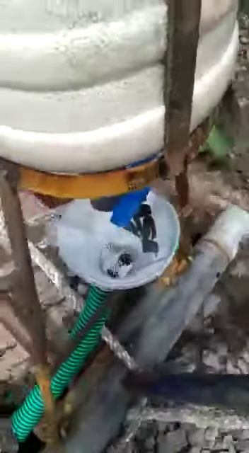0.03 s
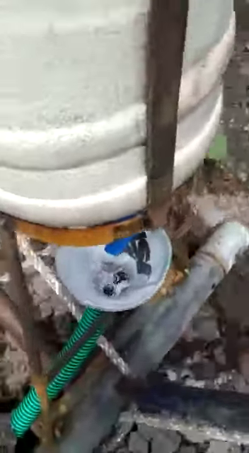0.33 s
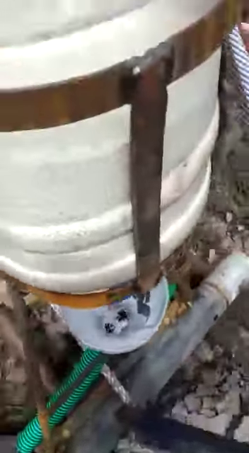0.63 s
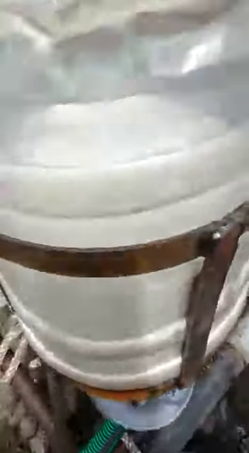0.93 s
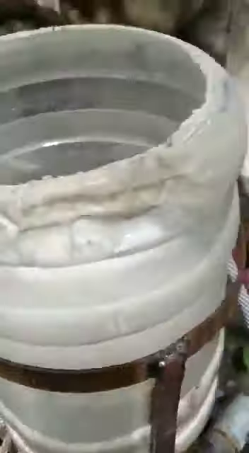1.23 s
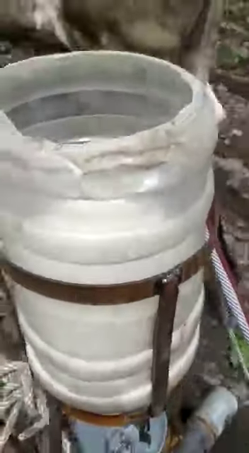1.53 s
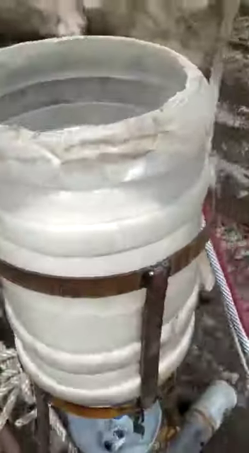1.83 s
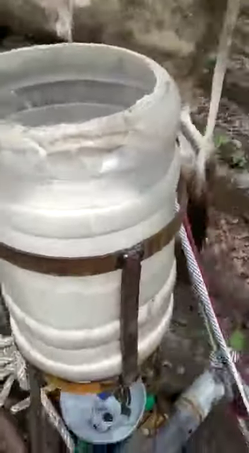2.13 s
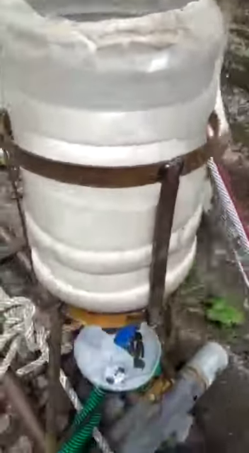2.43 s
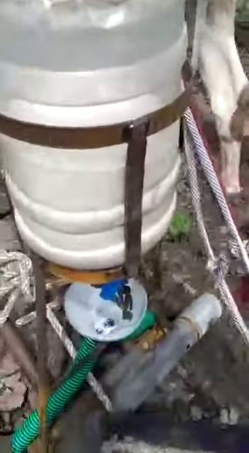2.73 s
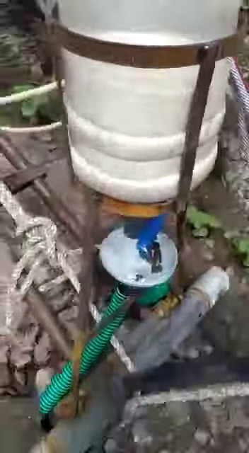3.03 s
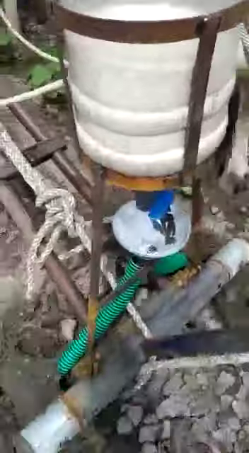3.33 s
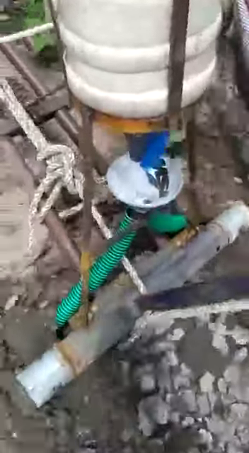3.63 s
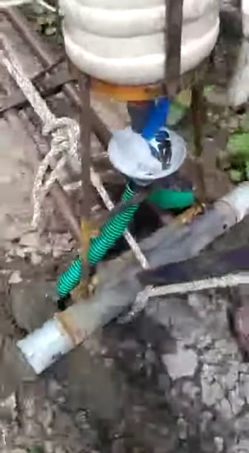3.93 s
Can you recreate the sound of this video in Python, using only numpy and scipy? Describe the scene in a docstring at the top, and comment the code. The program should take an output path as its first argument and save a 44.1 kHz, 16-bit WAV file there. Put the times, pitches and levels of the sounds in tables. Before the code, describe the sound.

Uneven hiss of water drawn down a funnel into a hose, under gusty wind rumble.

```python
"""Outdoors, water and air are drawn down a small funnel into a hose: an uneven, spitting hiss, coloured
by the hose's narrow resonances, over light wind and faint distant air. Soft slurps and airy whistles
come and go. From half a second in, gusts buffet the two ports of a hand-held microphone, with hollow
knocks at the sharpest hits. A lull follows, with one thump of air on the left. Near two seconds the
gusts return and stay to the end, rasping and knocking when they hit hard."""
import sys
import numpy as np
from scipy import signal
from scipy.fft import rfft, irfft
from scipy.io import wavfile
from scipy.ndimage import map_coordinates

SR = 44100
rng = np.random.default_rng(int(sys.argv[2]) if len(sys.argv) > 2 else 0)


def wav_record(signal):
    """Record a signal, one row per channel, as 16-bit PCM in the file named by sys.argv[1]."""
    frames = np.transpose(np.atleast_2d(signal))
    bounded = np.clip(frames, -1, 1)
    # unit amplitude maps onto the largest positive 16-bit level
    quanta = np.round(bounded * 32767).astype(np.int16)
    wavfile.write(sys.argv[1], SR, quanta)


N = 176400
TIME = np.arange(N) / SR


def from_db(db):
    """Decibels to gain."""
    return 10 ** (np.asarray(db) / 20)


def unit_rms(x):
    """Scale to an rms of 1."""
    return x / np.sqrt(np.mean(x ** 2) + 1e-20)


def automation(rows):
    """Join breakpoints (seconds, values..) with straight lines: one curve per value column."""
    times, *columns = np.transpose(rows)
    return np.array([np.interp(TIME, times, column) for column in columns])


def bell(offset, width):
    """A bell of height 1, half as high at the ends of its width."""
    return .5 ** ((2 * offset / width) ** 2)


def swell(centre_s, length_s):
    """A bell-shaped fade in and out."""
    return bell(TIME - centre_s, length_s)


def drift(rate_hz):
    """A smooth random wobble of rms 1, rolling off above rate_hz."""
    hop, settle = 40, 2000
    pole = np.exp(-2 * np.pi * rate_hz * hop / SR)
    white = rng.standard_normal(N // hop + settle + 2)
    slow = signal.lfilter([1], [1, -2 * pole, pole * pole], white)[settle:]
    return np.interp(np.arange(N) / hop, np.arange(len(slow)), unit_rms(slow))


def shaped_noise(spectrum, resonances=(), size=N, ripple_db=0, ripple_step_hz=55):
    """Two unrelated noises through an EQ curve, with optional peaks, notches and fine random ripple."""
    hz = np.maximum(np.fft.rfftfreq(size, 1 / SR), 1)
    points_hz, levels_db = np.transpose(spectrum)
    eq_db = np.interp(np.log(hz), np.log(points_hz), levels_db)
    ripple = rng.standard_normal(2000)
    eq_db += ripple_db * np.interp(hz / ripple_step_hz, np.arange(len(ripple)), ripple)
    for centre_hz, width_hz, height_db in resonances:
        eq_db += height_db * bell(hz - centre_hz, width_hz)
    white = rfft(rng.standard_normal((2, size)))
    return unit_rms(irfft(white * from_db(eq_db) * (hz > 10), size))


def ringing_noise(hz, width_hz):
    """Stereo noise ringing in one resonance."""
    lowpass = signal.butter(2, width_hz / 2, fs=SR, output="sos")
    in_phase, quadrature = signal.sosfilt(lowpass, rng.standard_normal((2, 2, N)))
    phase = 2 * np.pi * hz * TIME
    return unit_rms(in_phase * np.cos(phase) + quadrature * np.sin(phase))


def mid_side(pair, correlation):
    """Mix two unrelated noises as mid and side, for a given left-right correlation."""
    mid = np.sqrt(1 + correlation) * pair[0]
    side = np.sqrt(1 - correlation) * pair[1]
    return np.array([mid + side, mid - side]) / np.sqrt(2)


def moving_colour(hiss):
    """As the microphone moves, the hiss shimmers; a peak glides on the left and holds on the right."""
    # The left peak. Each row: time in seconds, centre in Hz, boost in dB.
    glide = [(0, 10000, 4), (.35, 10600, 4.5), (.65, 10200, 7), (.95, 9500, 7), (1.2, 8800, 8),
             (1.55, 8800, 8), (1.85, 9000, 8), (2.2, 9600, 7), (2.45, 10200, 6.5), (2.75, 10900, 5),
             (3.05, 10500, 2), (3.4, 10000, 2), (3.7, 10000, 3.5), (4, 9800, 3)]
    # The hiss's lower band against the rest. Each row: time in seconds, boost in dB.
    low_band = [(0, -4.5), (.17, -3), (.27, -2.5), (.42, -0.5), (.55, -1.5), (.7, -6), (.95, 4), (1.3, 2),
                (1.53, 0), (1.85, 2), (2.25, 0.5), (2.41, 0), (2.6, 1), (2.9, 0), (3.1, -2), (3.36, -1.5),
                (3.44, 11), (3.52, -7), (3.7, -2), (3.86, -0.5), (4, 7)]
    shimmer_db, shimmer_step_hz, shimmer_step_s = 3.8, 70, .08
    hz, times, frames = signal.stft(hiss, SR, nperseg=1024, noverlap=768)
    hz = hz[:, None]
    frame_samples = np.minimum((times * SR).astype(int), N - 1)
    centre_hz, peak_db = automation(glide)[:, frame_samples]
    dip_above = .31 * bell(hz - 1.3 * centre_hz, width=2600)
    left_db = peak_db * (bell(hz - centre_hz, width=2600) - dip_above)
    right_db = 4 * bell(hz - 8430, width=2100)
    low_db = automation(low_band)[0, frame_samples] * bell(hz - 5100, width=1000)
    grid = np.broadcast_arrays(hz / shimmer_step_hz, times / shimmer_step_s)
    shimmer = map_coordinates(rng.standard_normal((400, 80)), grid, order=3, mode="wrap")
    shared_db = low_db + shimmer_db * shimmer
    gain = from_db([left_db + shared_db, right_db + shared_db])
    power = np.mean(np.abs(frames) ** 2, axis=-1, keepdims=True)
    gain /= np.sqrt(np.sum(power * gain ** 2, axis=1, keepdims=True))  # colour moves, level holds
    _, coloured = signal.istft(frames * gain, SR, nperseg=1024, noverlap=768)
    return unit_rms(coloured[:, :N])


def die_away(clicks, decay_s):
    """Give each click an exponential tail."""
    return signal.lfilter([1], [1, -np.exp(-1 / (decay_s * SR))], clicks + 1e-18)


def spatter():
    """Power envelope of the spray: a steady part, many tiny droplets and a few larger spits."""
    # Larger spits. Each row: start in seconds, level in dB relative to the hiss.
    spits = [(.222, 2), (.288, 4), (.340, 9), (.548, 6), (.562, 3), (1.253, 7), (1.571, 7), (1.838, 2),
             (1.864, 4), (2.318, 5), (2.464, 2)]
    drops_per_s, drop_share, spread_db = 180, .27, 3
    drop_power = from_db(spread_db * np.minimum(rng.exponential(1, N), 4)) ** 2
    drops = die_away(drop_power * (rng.random(N) < drops_per_s / SR), decay_s=.0024)
    spit_power = np.zeros(N)
    for start_s, db in spits:
        spit_power[int(start_s * SR)] = from_db(db) ** 2
    return 1 - drop_share + drop_share * drops / drops.mean() + die_away(spit_power, decay_s=.006)


def funnel_hiss():
    """Air and spray rush through the funnel's throat and ring in the hose."""
    # Fader and pan. Each row: time in seconds, relative level in dB, left minus right in dB.
    fader = [(0.0, -27, 1.5), (0.09, -26, 1.5), (0.17, -35, 1.5), (0.29, -28, 2), (0.52, -29, 4),
             (0.57, -34.5, 11), (0.62, -32.5, 2), (0.91, -32.5, 13.5), (0.99, -33.5, 12.5),
             (1.04, -35.5, 0), (1.1, -27.5, 9), (1.25, -40.5, 9), (1.27, -33.5, 10.5), (1.38, -33.5, 9.5),
             (1.43, -28.5, 8), (1.8, -31, 7.5), (1.87, -31, 10), (1.89, -36.5, 4.5), (2.02, -41.5, -3),
             (2.21, -30.5, 3), (2.44, -29.5, 10), (2.54, -39.5, -3.5), (2.62, -38.5, 8.5),
             (2.74, -30.5, 1.0), (2.93, -35, 11), (3.0, -34.5, 1.5), (3.1, -28.5, 1.5), (3.26, -38, 2),
             (3.29, -31.5, 1), (3.56, -39, -0.5), (3.65, -29, 2), (3.69, -34, -0.5), (3.83, -30.5, 6),
             (3.9, -32.5, -1), (3.97, -44.5, 9), (4.0, -46, 22)]
    # The bright tone of the rush. Each row: frequency in Hz, relative level in dB.
    spectrum = [(500, -34), (1600, -22), (3200, -20), (4100, -15.5), (5000, -8), (6000, -9.5), (7200, -4.5),
                (8500, -3), (10000, -3.5), (11500, -4.5), (13000, -6.5), (15500, -8.5)]
    # Resonances of the hose. Each row: centre in Hz, width in Hz, boost in dB.
    hose_modes = [(2910, 50, 6), (3470, 50, 6), (4750, 35, 9), (5005, 40, 8), (5150, 40, 5), (5275, 45, 7),
                  (5440, 40, 4), (6050, 80, 4.4), (6385, 35, 6), (6740, 70, 6), (6950, 45, 5),
                  (7107, 80, 6), (7260, 50, 4), (7490, 30, 4), (7730, 75, 6), (8050, 55, 4),
                  (8480, 45, 4.5), (8580, 55, 5), (9365, 60, 4.2), (9750, 75, 4), (10576, 45, 5),
                  (11200, 45, 5), (12080, 130, 4.6)]
    # Notches of the hose. Each row: centre in Hz, width in Hz, gain in dB.
    hose_notches = [(4160.0, 90.0, -7.0), (5620.0, 130, -5.0), (5990.0, 50.0, -4.3), (6220.0, 130, -11.0),
                    (6610.0, 80.0, -6.0), (7430.0, 130, -5.4), (7970.0, 130, -4.6)]
    trim_db = 2
    level_db, pan_db = automation(fader)
    hose = shaped_noise(spectrum, [*hose_modes, *hose_notches], ripple_db=1.5)
    hose = mid_side(hose, correlation=.032)
    flutter_db = .7 * drift(rate_hz=40) + drift(rate_hz=12)
    gain = from_db(trim_db + level_db + flutter_db + np.array([[.5], [-.5]]) * pan_db)
    return moving_colour(hose) * np.sqrt(spatter()) * gain


def wind():
    """Turbulence sweeps past each port: faster air is brighter, and louder until the port saturates."""
    # Gusts at the left port. Each row: time in seconds, strength in dB.
    gusts_left = [(0, -18), (.06, -30), (.53, -29), (.57, 4), (.62, 0), (.68, 3), (.8, -8), (.87, -5),
                  (.91, -18), (.98, -19), (1.02, 3), (1.1, -29), (1.28, -37), (1.36, -29), (1.76, -33),
                  (1.84, -19), (1.9, 8), (2.03, 6), (2.16, 2), (2.25, -3), (2.295, -17), (2.33, -4),
                  (2.42, -10), (2.49, 8), (2.54, 3), (2.575, -7), (2.63, 2), (2.66, -7), (2.7, 4),
                  (2.76, -11), (2.83, -10), (2.85, 2), (2.93, -1), (2.98, 8), (3.09, 0), (3.15, -17),
                  (3.18, -1), (3.27, -17), (3.32, -14), (3.36, 5), (3.47, 1), (3.52, 5), (3.6, 3),
                  (3.635, -18), (3.67, 3), (3.88, -4), (3.93, -15), (3.96, -3), (4, -10)]
    # Gusts at the right port. Each row: time in seconds, strength in dB.
    gusts_right = [(0, -11), (.11, -14), (.16, -7), (.24, -13), (.38, -10), (.43, -27), (.48, -27),
                   (.51, -7), (.56, 0), (.62, -5), (.68, 4), (.8, -5), (.93, 1), (1.0, -4), (1.09, -19),
                   (1.22, -34), (1.41, -28), (1.52, -31), (1.59, -24), (1.65, -36), (1.77, -35), (1.81, 3),
                   (1.9, 0), (2.07, 3), (2.14, -15), (2.35, -8), (2.48, 0), (2.56, -7), (2.63, 5),
                   (2.72, -3), (2.81, -28), (2.845, -1), (2.9, 3), (2.96, -4), (3.1, -2), (3.17, -11),
                   (3.21, -3), (3.3, -6), (3.5, 4), (3.61, -12), (3.7, -1), (3.82, -1), (3.87, -8),
                   (3.9, -3), (4, -3)]
    # Single buffets on top. Each row: centre and length in seconds, left and right boost in dB.
    buffets = [(.021, .012, 0, 9), (.092, .016, 0, 11), (.16, .022, 0, 8), (.198, .012, 0, 6),
               (.227, .008, 0, 10), (.27, .018, 0, 7), (.305, .012, 0, 7), (.367, .014, 2, 11),
               (.516, .008, 4, 9), (.57, .022, 5, 4), (.655, .025, 5, 7), (.731, .012, 11, 7),
               (.781, .012, 12, 0), (.975, .012, 2, 8), (1.026, .015, 7, 0), (1.588, .015, 5, 11),
               (1.832, .012, 0, 9), (1.861, .012, 2, 7), (1.922, .012, 6, 0), (1.987, .014, 8, 3),
               (2.005, .014, 8, 8), (2.033, .016, 11, 0), (2.076, .016, 5, 7), (2.205, .014, 0, 11),
               (2.377, .012, 11, 2), (2.497, .028, 8, 0), (2.548, .012, 8, 0), (2.599, .01, 4, 13),
               (2.634, .02, 6, 10), (2.709, .01, 9, 0), (2.841, .012, 8, 8), (2.893, .024, 3, 9),
               (2.973, .018, 5, 0), (3.006, .035, 7, 3), (3.052, .012, 2, 8), (3.183, .012, 7, 0),
               (3.205, .012, 3, 9), (3.365, .025, 4, 0), (3.487, .012, 0, 6), (3.729, .012, 0, 7),
               (3.944, .006, 0, 10), (3.961, .01, 5, 8)]
    # The rumble at a speed of 1. Each row: frequency in Hz, relative level in dB.
    spectrum = [(10, -4.5), (25, 0), (60, -2.5), (130, -7), (250, -13), (500, -25.5), (900, -46),
                (1600, -57.5), (3200, -107), (8000, -115)]
    trim_db, knee_db, growth, port_limit = -9.5, 10, .52, .8
    speed_follow, buffet_rush = .32, .2  # dB of speed per dB of strength, and extra per dB of buffet
    calm_db = -21  # weaker wind than this gets no duller
    turbulence = shaped_noise(spectrum, size=2 * N)
    out = np.zeros((2, N))
    for side, gusts in enumerate((gusts_left, gusts_right)):
        buffet_db = sum(dbs[side] * swell(centre_s, length_s) for centre_s, length_s, *dbs in buffets)
        eddy_db = 1.8 * drift(rate_hz=14) + 7.5 * np.tanh(drift(rate_hz=70))
        strength_db = automation(gusts)[0] + buffet_db + eddy_db
        jitter_db = 1.2 * np.tanh(drift(rate_hz=300))
        speed_db = speed_follow * np.maximum(strength_db, calm_db) + buffet_rush * buffet_db + jitter_db
        travel = np.cumsum(from_db(speed_db))
        pressure = map_coordinates(turbulence[side], [travel], order=3, mode="wrap")
        gain = from_db(trim_db) / (from_db(-knee_db) + from_db(-strength_db)) ** growth
        out[side] = port_limit * np.tanh(gain * pressure / port_limit)
    return out


def distant_air():
    """A faint, steady bed of outdoor noise."""
    # The tone of the bed. Each row: frequency in Hz, relative level in dB.
    spectrum = [(30, 23.5), (200, 2), (500, 8), (1000, 6), (1700, -4.5), (3000, -0.5), (6000, -40),
                (16000, -22)]
    return from_db(-48) * shaped_noise(spectrum)


def slurps():
    """The hose slurps softly: short, rough swells of midrange noise, a little to the left."""
    # Each row: centre in seconds, length in seconds, level on the left in dB.
    swells = [(0.277, 0.088, -43.5), (0.913, 0.052, -39), (1.1, 0.052, -40.5), (1.516, 0.048, -40),
              (1.804, 0.077, -49), (2.15, 0.045, -43.5), (2.39, 0.029, -48), (3.385, 0.091, -44)]
    # The tone of a slurp. Each row: frequency in Hz, relative level in dB.
    spectrum = [(400, -44), (1000, 22), (1650, 32), (2200, 26.5), (2800, 28), (4000, 25), (7000, -118)]
    envelope = sum(from_db(db) * swell(centre_s, length_s) for centre_s, length_s, db in swells)
    rough_noise = shaped_noise(spectrum) * from_db(.73 * drift(rate_hz=92))
    return envelope * rough_noise * from_db([[0], [-2]])


def knocks():
    """The sharpest buffets make a port ring briefly and hollowly."""
    # Each row: centre and length in seconds, pitch in Hz, left and right level in dB.
    hits = [(.370, .007, 650, -45, -21), (.516, .007, 520, -33, -25), (2.502, .008, 950, -17, -40),
            (2.598, .009, 850, -33, -21), (2.636, .018, 520, -20, -13)]
    out = np.zeros((2, N))
    for centre_s, length_s, hz, *dbs in hits:
        envelope = swell(centre_s, length_s)
        ring = envelope * ringing_noise(hz, width_hz=220)
        makeup_gain = np.sqrt(np.sum(envelope ** 2) / np.sum(ring ** 2, axis=1, keepdims=True))
        out += from_db(dbs)[:, None] * ring * makeup_gain
    return out


def whistles():
    """Narrow bands of noise swell into faint, airy whistles inside the hiss."""
    # Each row: centre and length in seconds, pitch in Hz, level in dB.
    tones = [(.41, .09, 4750, -46), (3.44, .05, 5020, -48), (3.86, .04, 5050, -45)]
    return sum(from_db(db) * swell(centre_s, length_s) * ringing_noise(hz, width_hz=120)
               for centre_s, length_s, hz, db in tones)


def thump():
    """One short push and pull of air on the left port."""
    # Each row: centre in seconds, peak amplitude.
    pulses = [(1.342, 0.25)]
    centre_to_peak_s = .00088
    out = np.zeros((2, N))
    for centre_s, peak in pulses:
        offset = (TIME - centre_s) / centre_to_peak_s
        out[0] -= peak * offset * np.exp((1 - offset ** 2) / 2)
    return out


def tearing():
    """In the hardest gusts the flow breaks up at the ports into a dense, rough rasp."""
    # Each row: centre and length in seconds, left and right level in dB.
    tears = [(1.875, .09, -32, -34), (2.01, .055, -23, -30), (2.5, .03, -20.5, -37), (2.622, .04, -31, -28),
             (2.893, .03, -33, -25), (2.99, .055, -23, -34), (3.44, .04, -31, -34), (3.51, .06, -34, -31)]
    # The tone of the rasp. Each row: frequency in Hz, relative level in dB.
    spectrum = [(200, -25), (450, 0), (800, -3), (1300, -13), (2000, -21), (3000, -32), (5000, -60)]
    envelope = sum(from_db(dbs)[:, None] * swell(centre_s, length_s)
                   for centre_s, length_s, *dbs in tears)
    rasp = shaped_noise(spectrum) * from_db(4 * np.tanh(drift(rate_hz=200)))
    return envelope * unit_rms(rasp)


def scene():
    """The funnel and hose, the wind on the microphone and the distant air."""
    funnel = funnel_hiss() + slurps() + whistles()
    wind_on_ports = wind() + tearing() + knocks() + thump()
    return funnel + wind_on_ports + distant_air()


def record(dry):
    """A steep low-pass takes off the very top."""
    cutoff_hz = 15800
    return signal.sosfilt(signal.ellip(12, .1, 80, cutoff_hz, fs=SR, output="sos"), dry)


dry = scene()
out = record(dry)
wav_record(out)
```